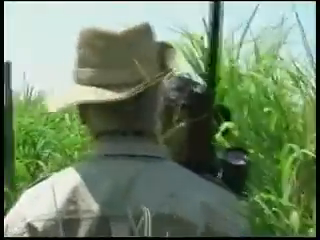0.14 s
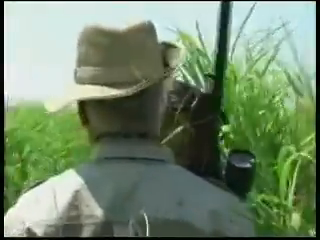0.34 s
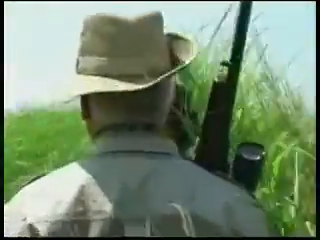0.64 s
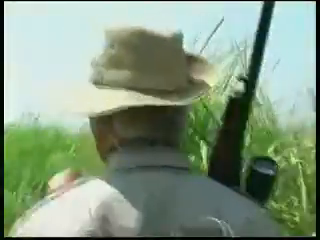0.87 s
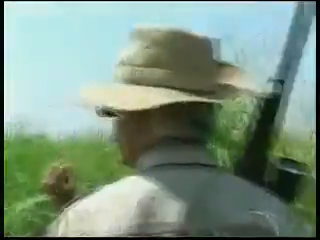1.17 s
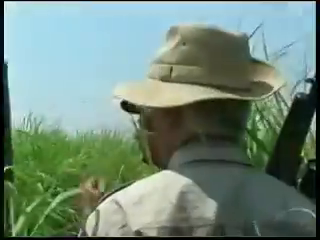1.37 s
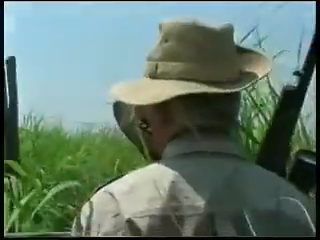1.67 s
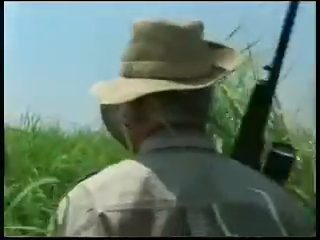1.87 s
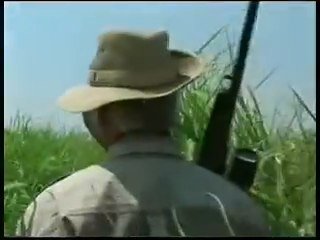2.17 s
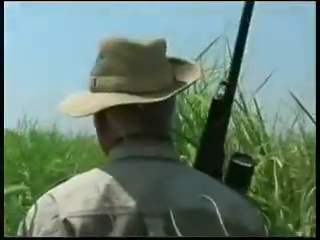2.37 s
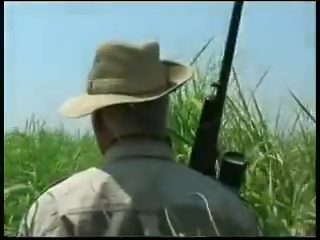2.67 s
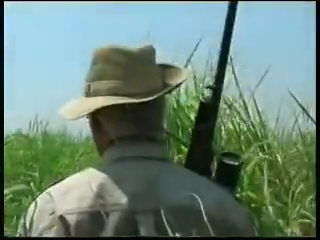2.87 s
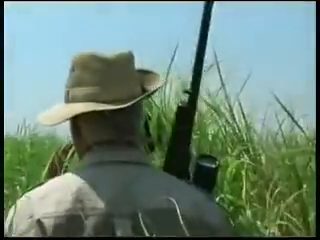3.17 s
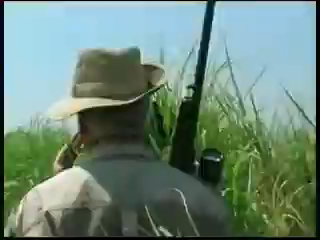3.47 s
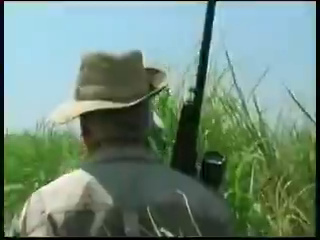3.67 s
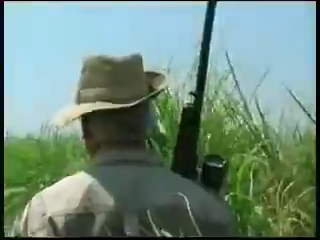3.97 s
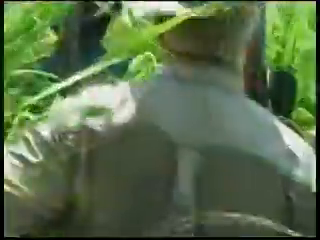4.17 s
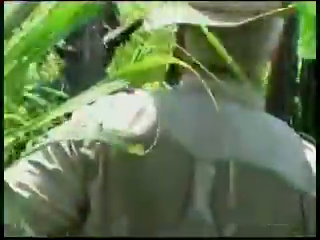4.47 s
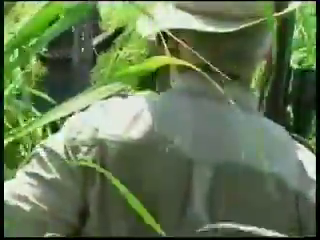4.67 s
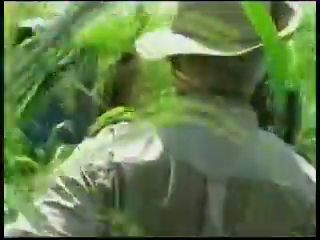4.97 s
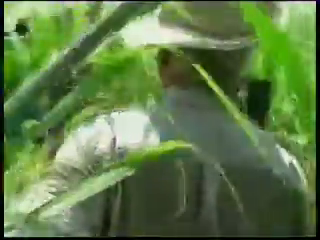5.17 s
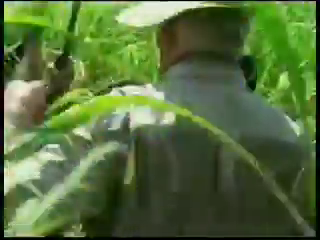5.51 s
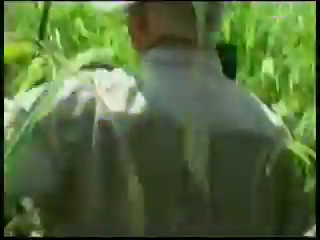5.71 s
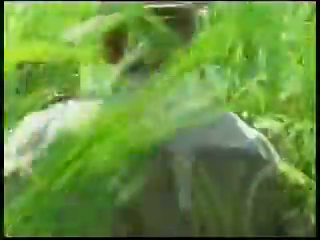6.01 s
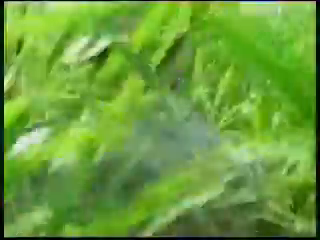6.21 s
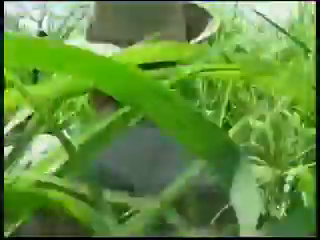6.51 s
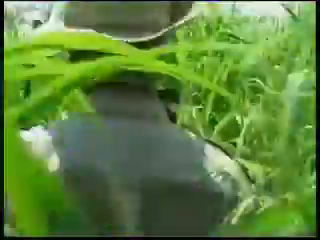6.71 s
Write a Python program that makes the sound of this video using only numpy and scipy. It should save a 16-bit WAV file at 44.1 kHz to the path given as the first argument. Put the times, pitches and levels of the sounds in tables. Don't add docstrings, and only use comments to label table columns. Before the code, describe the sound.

Outdoors in tall grass, walkers push through a few steps away: faint rubbing, tiny dry ticks and a dull bump of gear. After about two seconds a soft thump marks a cut, and grass sweeps loudly close to the microphone, with snapping stems, crackling leaves and one hollow knock. An old tape camera adds hiss, low buzz and a thin high whistle.

```python
import sys
import numpy as np
from scipy import signal
from scipy.fft import rfft, irfft
from scipy.io import wavfile
from scipy.ndimage import uniform_filter1d

SR = 44100
rng = np.random.default_rng(int(sys.argv[2]) if len(sys.argv) > 2 else 0)


def unload_audio(sound):
    columns = np.transpose(np.atleast_2d(sound))
    steps = np.round(np.clip(columns, -1, 1) * 32767)
    wavfile.write(sys.argv[1], SR, steps.astype(np.int16))


def boost(x):
    u = np.asarray(x, float) / 20
    return 10 ** u


N = 302085
SCENE_CHANGE_S = 2.176
USUAL_PUSH_DB = -44.5

# time_s, leaf_level_db
PUSH_CURVES = [
    [(0.0, -58), (0.5, -65.5), (1.3, -65.5), (1.6, -63.5), (2.05, -63), (2.17, -76)],
    [(2.18, -48), (2.23, -42.5), (2.66, -47), (2.71, -44), (3.28, -47.5), (3.56, -44), (5.04, -45),
     (5.68, -50.5), (6.0, -45), (6.22, -50), (6.58, -44.3), (6.85, -50)],
]


def rms_one(x):
    return x / np.sqrt(np.mean(x ** 2) + 1e-20)


def in_time(tables):
    s, *columns = np.concatenate(tables).T
    return [np.interp(np.arange(N) / SR, s, column) for column in columns]


def at_hz(points, hz):
    point_hz, value = np.array(points).T
    return np.interp(np.log(hz), np.log(point_hz), value)


def spectrum_hz():
    return np.maximum(np.arange(N // 2 + 1) * SR / N, 1)


def drift(rate_hz):
    r = np.exp(-80 * np.pi * rate_hz / SR)
    slow = signal.lfilter([1], [1, -2 * r, r * r], rng.standard_normal(N // 40 + 2002))[2000:]
    return np.interp(np.arange(N) / 40, np.arange(len(slow)), rms_one(slow))


def butter(x, hz, kind, order=2):
    return signal.sosfilt(signal.butter(order, hz, kind, fs=SR, output="sos"), x)


def overshoot(x, hz, width_hz):
    r, w = np.exp(-np.pi * width_hz / SR), 2 * np.pi * hz / SR
    poles = [1, -2 * r * np.cos(w), r * r]
    return signal.lfilter([sum(poles)], poles, x)


def add(track, s, sound):
    start = round(s * SR)
    track[start:start + len(sound)] += sound[:N - start]


def dying(t60, size=13000):
    t = np.arange(size) / SR
    return t, boost(-60 * t / t60)


def hiss():
    # pitch_hz, density_db
    hiss_colour = [(8, -2), (30, -17), (70, -8.5), (200, -14.5), (850, -15.5), (1130, -19), (4170, -16.5),
                   (6200, -15), (7070, -9.5), (8000, -13), (13500, -18.5), (15400, -36)]
    # pitch_hz, gain_db
    right_colour = [(30, -3.5), (300, -14), (1000, -10), (3000, -22), (12000, -33)]
    hz = spectrum_hz()
    shared, left, right = rng.standard_normal((3, N))
    pair = rfft(np.array([shared + 0.86 * left, shared + 1.6 * right])) * boost(at_hz(hiss_colour, hz))
    pair[1] *= boost(at_hz(right_colour, hz))
    pair = irfft(pair, N)
    return boost(-57) * pair / np.std(pair[0])


def spill(live):
    # pitch_hz, density_db
    spill_colour = [(60, 4), (300, 3.5), (1000, -3), (3000, -4), (8500, -27), (10500, -24), (13600, -10),
                    (14600, -24)]
    loudness = np.sqrt(uniform_filter1d(live ** 2, size=900) + 1e-14)
    noise = rfft(loudness * rng.standard_normal(N))
    return boost(-66.5) * rms_one(irfft(noise * boost(at_hz(spill_colour, spectrum_hz())), N))


def buzz_levels():
    # time_s, field_hum_db, line_whistle_db
    picture_levels = [(0, -66.5, -74), (2.17, -63, -76), (2.4, -67, -73), (3.0, -62, -69), (5.0, -60, -72),
                      (5.45, -70, -79), (6.2, -64.5, -71), (6.6, -61, -72), (6.85, -57, -77)]
    near = np.arange(N) / SR > SCENE_CHANGE_S
    lag_s, follows = 0.17, 0.51
    push = uniform_filter1d(in_time(PUSH_CURVES)[0], size=round(lag_s * SR))
    ride = near * follows * np.maximum(push - USUAL_PUSH_DB + 1.5, -6)
    flip_db = np.where(near, -48, -58) + ride
    drum_db = np.where(near, -58.5, -67) + ride
    return flip_db, drum_db, *in_time([picture_levels])


def tape_buzz():
    frame_hz, lines = 25, 625
    t = np.arange(N) / SR
    flip_db, drum_db, field_db, whistle_db = buzz_levels()
    frame, field = t * frame_hz % 1, t * frame_hz * 2 % 1

    flip = np.where((frame > .414) & (frame < .914), -1., 1.)
    kicks = butter(butter(flip, 115, "high"), 240, "low")
    drum = boost(flip_db) * kicks + boost(drum_db) * np.cos(2 * np.pi * (frame - .458))

    blank = 1. * ((field > .61) & (field < .715)) - .6 * ((field > .715) & (field < .925))
    picture = boost(-62.8) * overshoot(blank, hz=770, width_hz=480)

    hum = boost(field_db) * np.cos(2 * np.pi * (field - .32))
    hum += boost(-75.5) * np.cos(2 * np.pi * (2 * field - .3))
    hum += boost(-76) * (t < SCENE_CHANGE_S) * np.cos(2 * np.pi * (3 * field + .1))

    gated = 1 + .5 * np.cos(2 * np.pi * field) + .3 * np.cos(4 * np.pi * field)
    whistle = boost(whistle_db + 4.5) * gated * np.sin(2 * np.pi * lines * frame_hz * t)
    skirt = boost(-76) * rms_one(butter(rng.standard_normal(N), [15470, 15730], "band", order=4))

    return drum * [[1], [.47]] + picture * [[1], [.85]] + hum * [[1], [.65]] + whistle + skirt


def spread(live):
    echo_taps = [(60, 0, -.018), (908, -.02, .04), (918, -.02, .018), (1383, .11, -.047), (1428, 0, .1),
                 (1475, -.068, .068), (2177, -.063, .068), (2346, .1, -.013)]
    dull = boost(2.9) * butter(live, 8900, "low", order=3)
    out = np.array([live, boost(-16) * butter(live, 610, "low", order=1)])
    for lag, left, right in echo_taps:
        out[:, lag:] += dull[:-lag] * [[left], [right]]
    return out


def bumps():
    # start_s, peak_db, pitch_hz, t60_s
    dull_bumps = [
        (1.011, -51, 380, 0.028),
        (1.019, -51, 216, 0.024),
        (1.026, -53, 604.8, 0.034),
        (1.029, -47, 290, .04),
        (1.036, -42, 190, .035),
        (1.059, -57, 222, 0.064),
        (3.365, -53.5, 378, .2),
        (4.8, -52, 450, .04),
        (5.296, -46, 460, 0.022),
        (5.434, -43.5, 151, 0.08),
    ]
    # pitch_hz, peak_db, t60_s
    knock_modes = [
        (535, -43.5, .085),
        (900, -47, .025),
        (1340, -42, .05),
        (2040, -43.5, .06),
        (2650, -47, .05),
    ]
    knock = [(3.329, db, hz, t60) for hz, db, t60 in knock_modes]
    thump = (SCENE_CHANGE_S, -44, -11, .4)
    out = np.zeros(N)
    for s, peak_db, hz, t60 in [*dull_bumps, thump, *knock]:
        t, fall = dying(t60)
        add(out, s, boost(peak_db) * fall * np.sin(2 * np.pi * hz * t))
    return out


def snaps():
    # start_s, peak_db, centre_hz, t60_s
    stem_snaps = [(0.578, -37.5, 7090, 0.027), (0.6564, -51, 7200, 0.03), (0.7467, -43, 7030, 0.033),
                  (0.8026, -37.5, 7150, 0.03), (0.8298, -37.5, 7200, 0.03), (0.8524, -46, 7600, 0.03),
                  (0.905, -46, 7240, 0.028), (1.597, -41.5, 6850, 0.03), (1.6244, -47, 7100, 0.03),
                  (1.697, -46, 6670, 0.03), (1.8944, -37.5, 6000, 0.037), (2.5148, -30, 4670, 0.027),
                  (4.9444, -36, 8460, 0.03), (5.0767, -26.5, 7260, 0.023)]
    # start_s, peak_db, centre_hz
    further_snaps = [(3.0177, -31, 7220), (3.6123, -31, 5870), (4.1985, -26.5, 4910), (4.6071, -34, 7440),
                     (5.1693, -29, 6160), (5.4567, -33, 6520), (5.6906, -36, 8160), (5.9046, -31, 7030)]
    crack_t60_s = .02
    out = np.zeros(N)
    for s, peak_db, hz, t60 in [*stem_snaps, *[(*row, crack_t60_s) for row in further_snaps]]:
        t, fall = dying(t60, size=3000)
        noise = rng.standard_normal(len(t)) * fall
        burst = butter(noise, [hz * 0.85, min(hz * 1.17, 15000)], "band", order=1)
        add(out, s, boost(peak_db + 1.5) * burst / np.abs(burst).max())
    return out


def sweep():
    # peak_s, leaf_db, rise_s, fall_s, stem_extra_db
    blade_swishes = [(.21, -66, 0.014, 0.026, 11), (.45, -60.5, 0.031, .02, 3), (.58, -61, .004, .015, 6),
                     (.81, -58.5, .004, 0.036, 5), (.84, -58, 0.018, 0.051, -3),
                     (1.12, -63, 0.044, .025, -8), (1.59, -62.5, .03, .03, 0), (1.7, -59, .008, .03, -3),
                     (1.91, -55.5, 0.048, 0.06, 1.5), (2.0, -61.5, 0.035, 0.02, 4),
                     (2.21, -56, 0.017, 0.054, 6), (3.1, -56, 0.11, 0.091, 1), (3.4, -61, .03, .03, 5),
                     (3.95, -53, 0.069, .2, -5), (4.47, -53, .01, .02, 11), (4.8, -50, 0.013, .03, 9),
                     (5.0, -46, 0.061, 0.017, 3), (5.18, -49, .015, .06, -14),
                     (5.33, -55.5, 0.038, 0.036, 12), (5.46, -50, .008, .015, 7), (5.9, -54, .02, .04, 2),
                     (6.38, -51, .06, 0.065, 1)]
    # centre_s, change_db, half_length_s
    push_lulls = [
        (0.74, -3, .02),
        (1.777, -6, 0.024),
        (5.12, -1.5, 0.037),
        (5.427, -0.5, 0.033),
    ]
    t = np.arange(N) / SR
    push = in_time(PUSH_CURVES)[0] - USUAL_PUSH_DB
    for s, db, half in push_lulls:
        push = push + db * np.exp(-((t - s) / half) ** 2)
    leaf, stem = boost(2 * push), boost(2 * push)
    for s, db, rise, fall, stem_db in blade_swishes:
        power = boost(2 * (db - USUAL_PUSH_DB)) * np.exp(-2 * np.abs(t - s) / np.where(t < s, rise, fall))
        leaf = leaf + power
        stem = stem + power * boost(2 * stem_db)
    leaf, stem = 10 * np.log10(leaf), 10 * np.log10(stem)
    close = 3 * np.exp(-((t - 2.45) / 0.14) ** 2)
    edge = 1.276 * leaf - 0.4 + np.where(t > SCENE_CHANGE_S, close, 4)
    return leaf, 0.82 * stem - 1, edge


def grass():
    # pitch_hz, density_db
    grass_colour = [(40, -22), (110, -13.5), (250, -17), (400, -13.5), (1310, -9), (2230, -8.5),
                    (5200, -1.5), (7470, 0.5), (10500, -3.5), (12000, -3.5), (14300, -7.5)]
    stem_hz, leaf_hz, edge_hz = 1280, 5560, 11600
    touches_per_s, touch_spread_db, touch_share = 2500, 4.5, 0.1
    leaf, stem, edge = sweep()
    sizes = boost(touch_spread_db * np.minimum(rng.exponential(1, N), 6)) * rng.choice([-1, 1], N)
    touched = rng.random(N) < touches_per_s * boost(2.5 * drift(40)) / SR
    touches = rms_one(sizes * touched)
    friction = rng.standard_normal((2, N))
    together = 0.59 * drift(50)
    edges = 50 * 2 ** np.arange(0, 8.4, 1 / 3)
    usual, moving = 0, 0
    for k, (low, high) in enumerate(zip(edges, edges[1:])):
        hz = np.sqrt(low * high)
        rubbing = np.sqrt(touch_share) * touches + np.sqrt(1 - touch_share) * friction[k % 2]
        band = butter(rubbing, [low, high], "band") * boost(at_hz(grass_colour, hz))
        to_stem = at_hz([(stem_hz, 1), (leaf_hz, 0)], hz)
        to_edge = at_hz([(leaf_hz, 0), (edge_hz, 1)], hz)
        swell_db = leaf + to_stem * (stem - leaf) + to_edge * (edge - leaf)
        usual = usual + band
        moving = moving + band * boost(swell_db + together + 0.62 * drift(5.4))
    return boost(-36) * moving / np.std(usual)


def scene():
    live = grass() + snaps() + bumps()
    tape = spread(live) + hiss() + spill(live) * [[0], [1]]
    tape = butter(tape, 14200, "low", order=7)
    trap = signal.cheby2(14, 30, 15370, fs=SR, output="sos")
    return signal.sosfilt(trap, tape) + tape_buzz()


def holes(x):
    below_db, floor_db = -4.5, -115
    hz, _, z = signal.stft(x, SR, window="cosine", nperseg=2048)
    power = np.abs(z[:1024]) ** 2
    band = np.repeat(power.reshape(128, 8, -1).mean(axis=1), 8, axis=0)
    around = uniform_filter1d(power, size=64, axis=0)
    masked = band < around * boost(2 * below_db) + boost(2 * floor_db)
    z[:1024] *= ~(masked & (hz[:1024, None] > 2000))
    return signal.istft(z, SR, window="cosine", nperseg=2048)[1][:N]


def band_limit(x):
    return signal.sosfilt(signal.butter(12, 15770, fs=SR, output="sos"), x)


def record(dry):
    mix = np.array([dry[0], holes(dry[1])])
    return band_limit(mix)


dry = scene()
out = record(dry)
unload_audio(out)
```